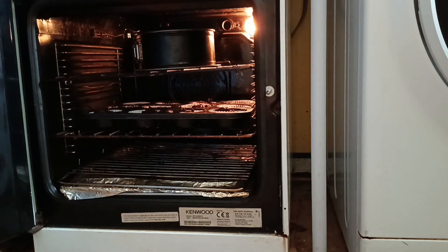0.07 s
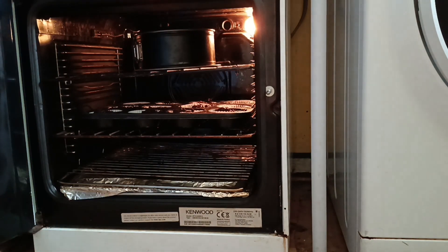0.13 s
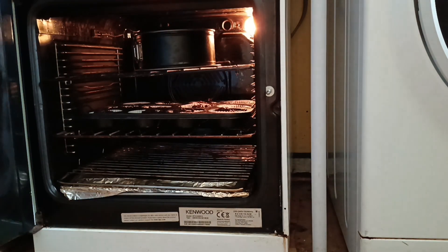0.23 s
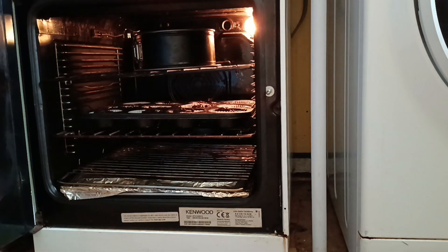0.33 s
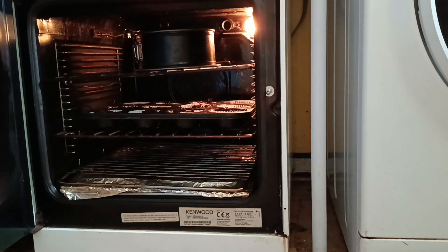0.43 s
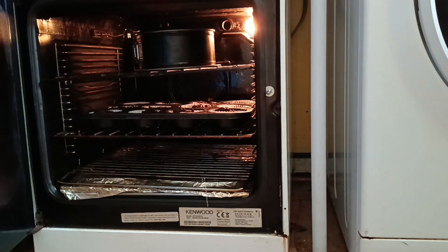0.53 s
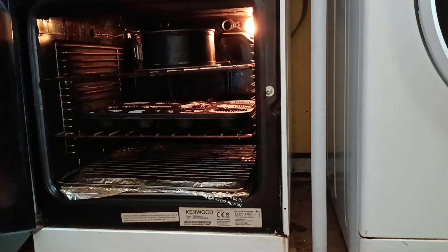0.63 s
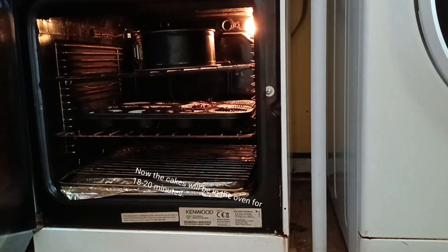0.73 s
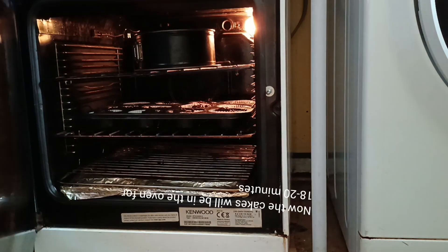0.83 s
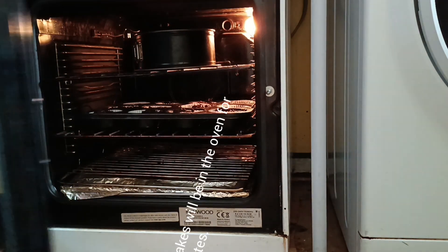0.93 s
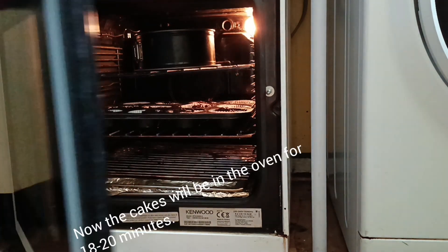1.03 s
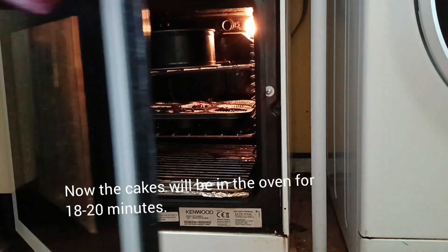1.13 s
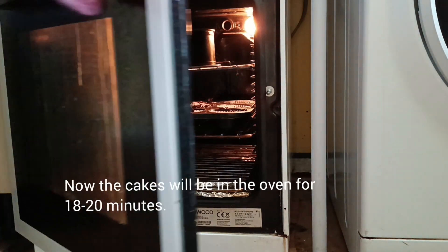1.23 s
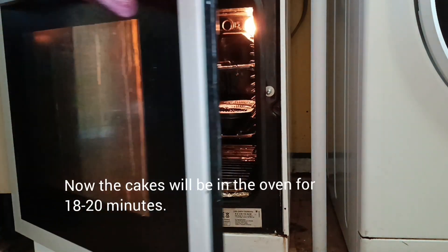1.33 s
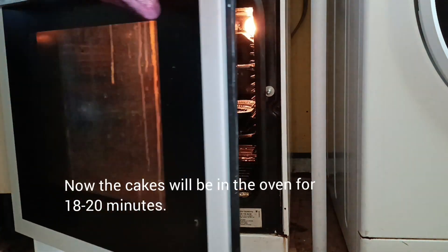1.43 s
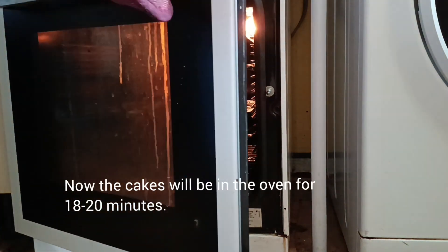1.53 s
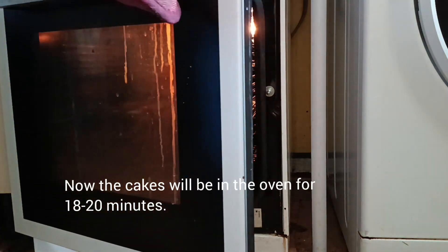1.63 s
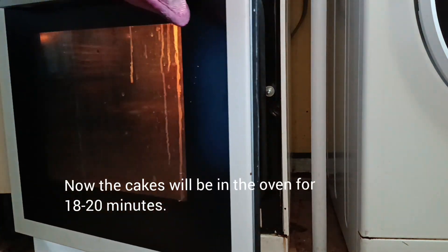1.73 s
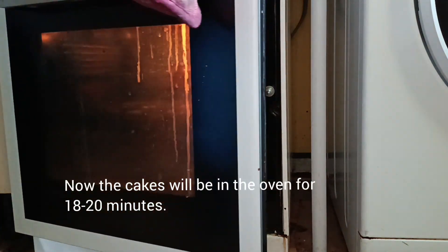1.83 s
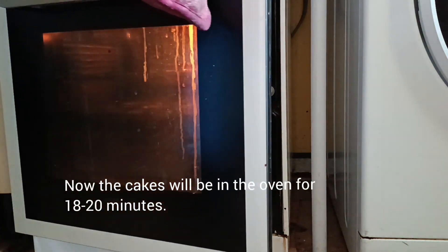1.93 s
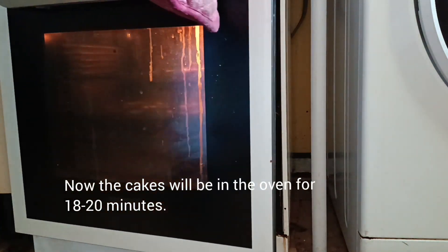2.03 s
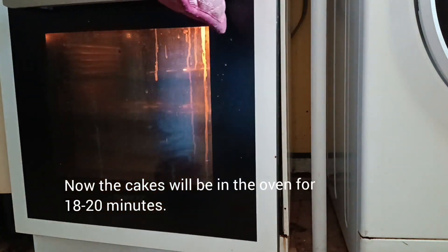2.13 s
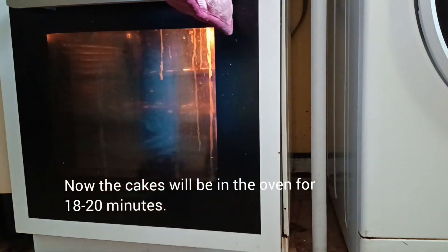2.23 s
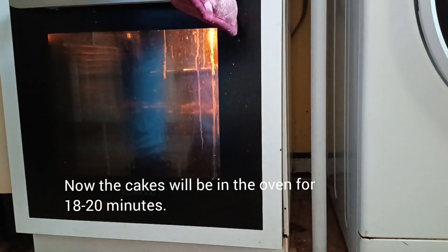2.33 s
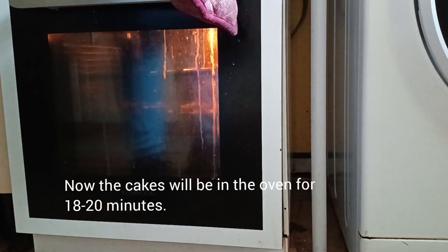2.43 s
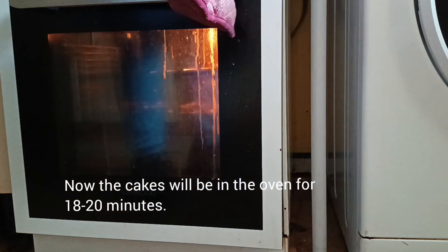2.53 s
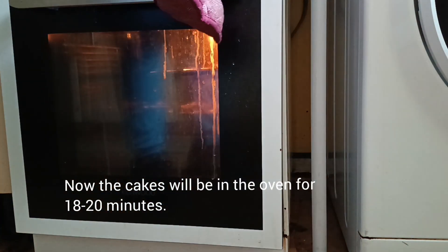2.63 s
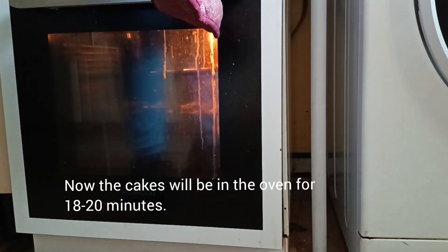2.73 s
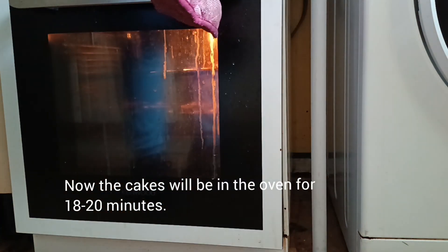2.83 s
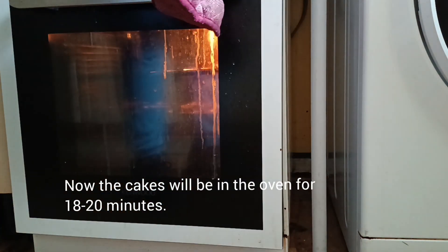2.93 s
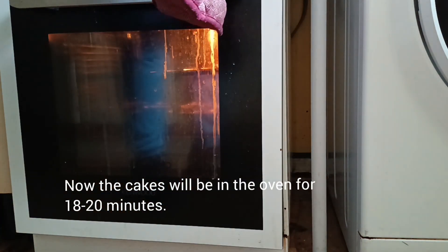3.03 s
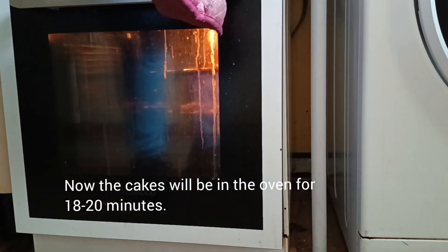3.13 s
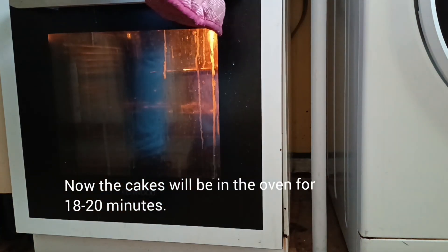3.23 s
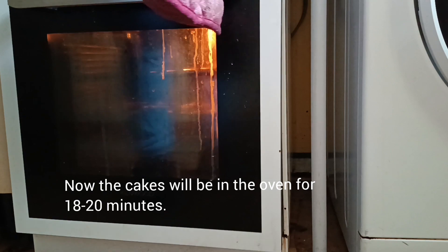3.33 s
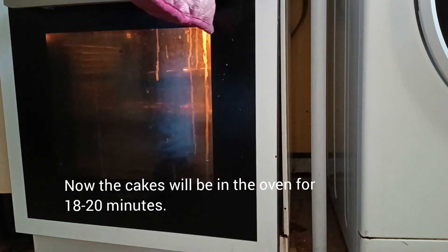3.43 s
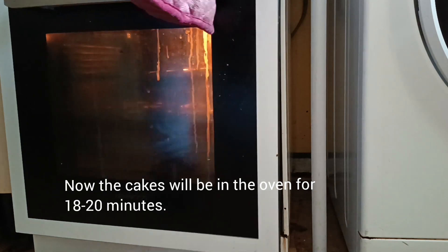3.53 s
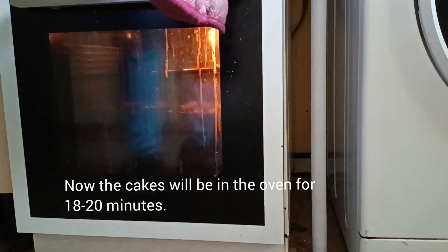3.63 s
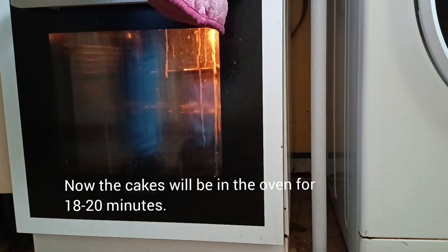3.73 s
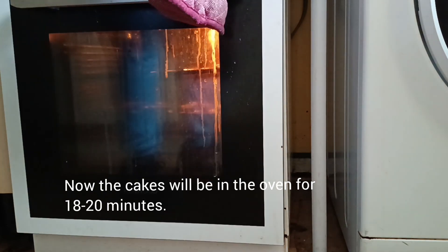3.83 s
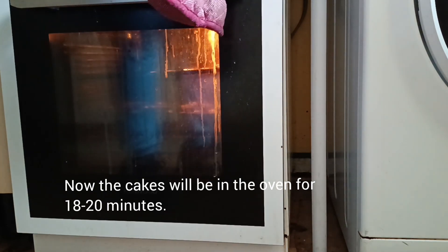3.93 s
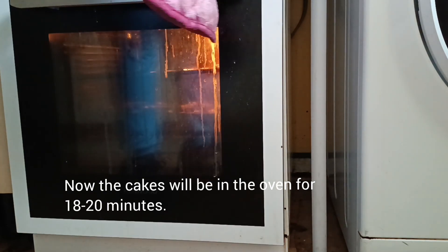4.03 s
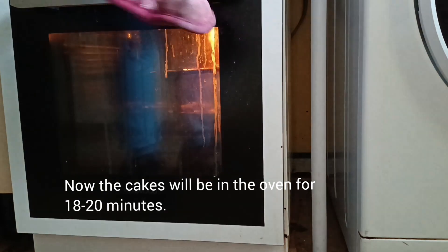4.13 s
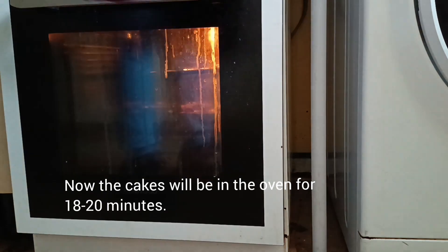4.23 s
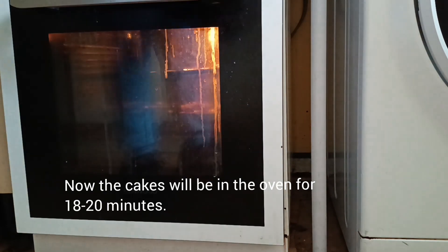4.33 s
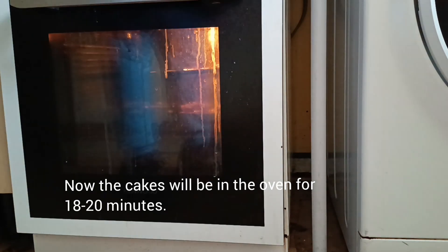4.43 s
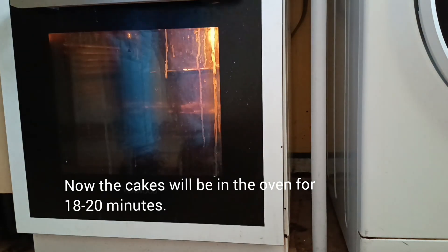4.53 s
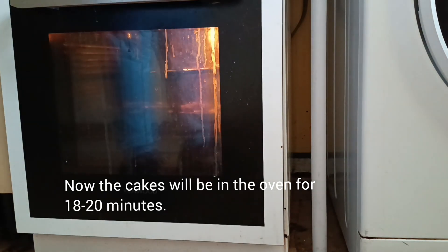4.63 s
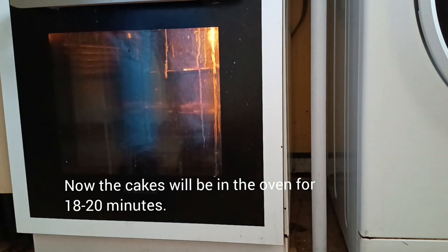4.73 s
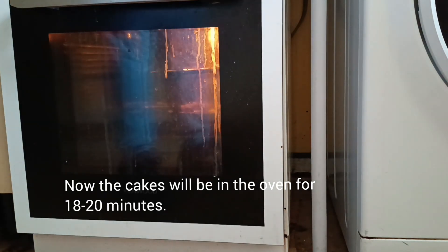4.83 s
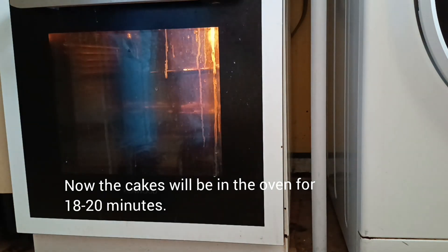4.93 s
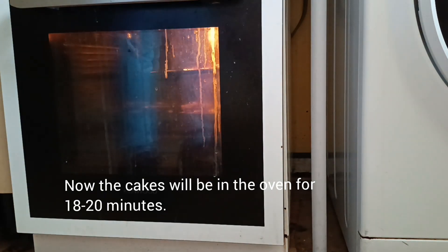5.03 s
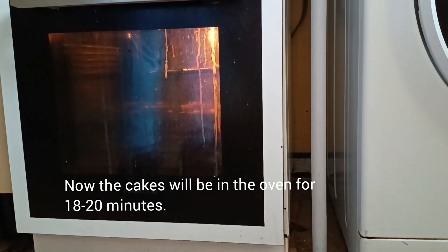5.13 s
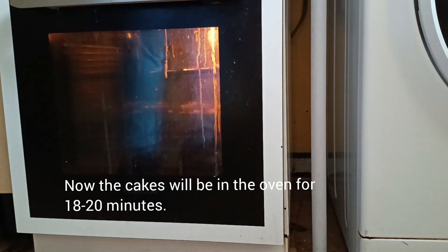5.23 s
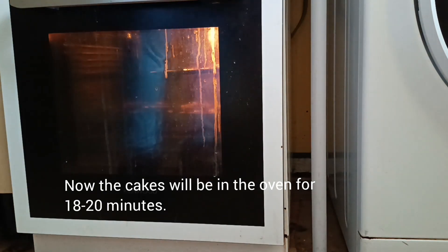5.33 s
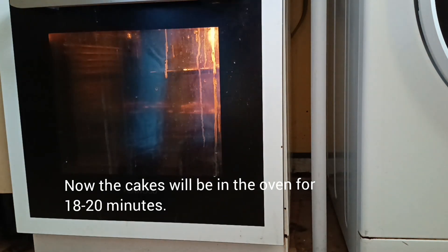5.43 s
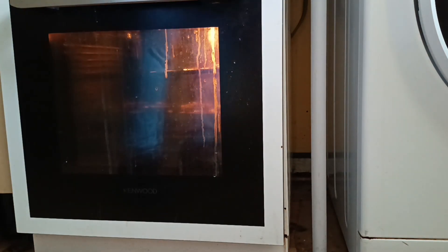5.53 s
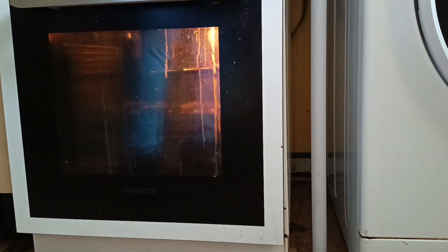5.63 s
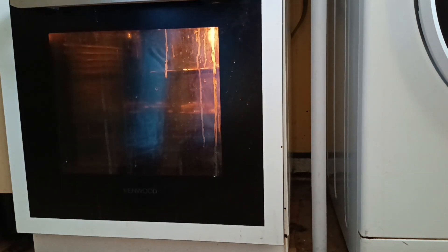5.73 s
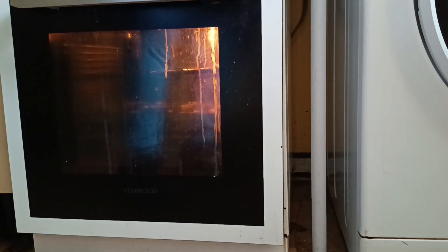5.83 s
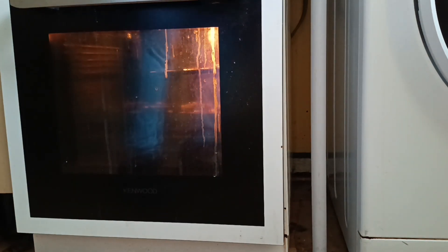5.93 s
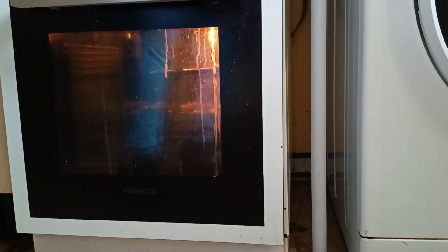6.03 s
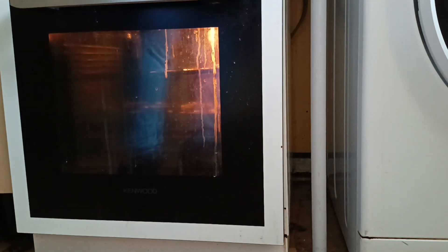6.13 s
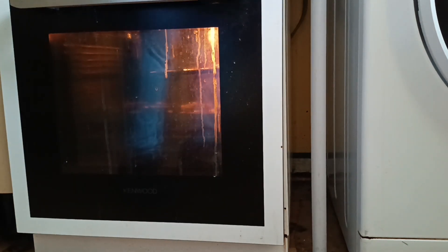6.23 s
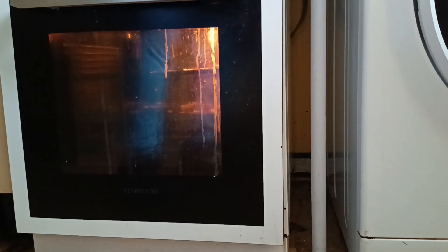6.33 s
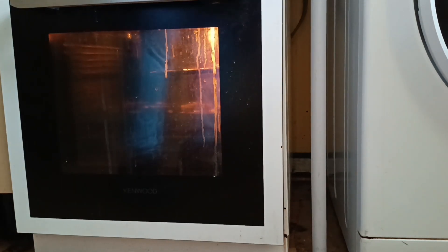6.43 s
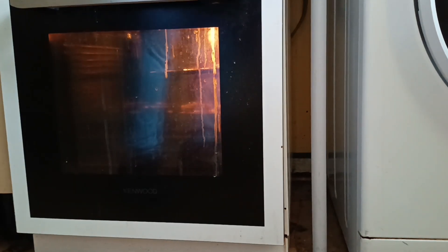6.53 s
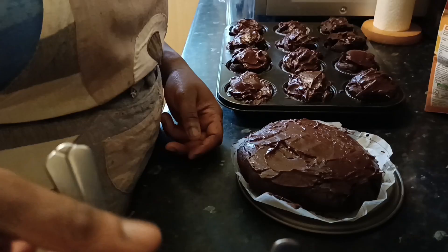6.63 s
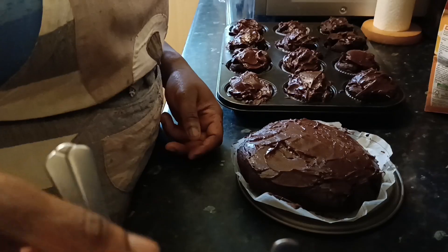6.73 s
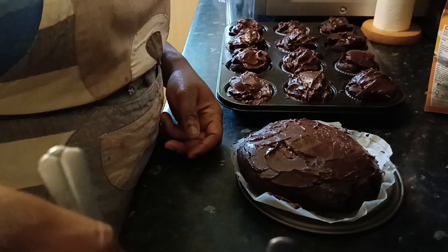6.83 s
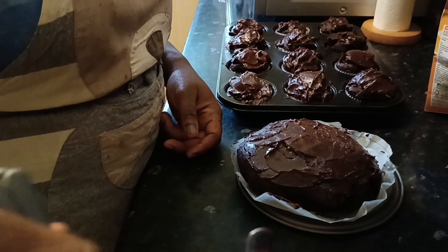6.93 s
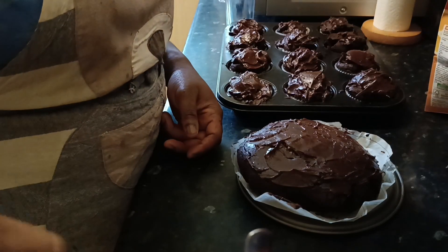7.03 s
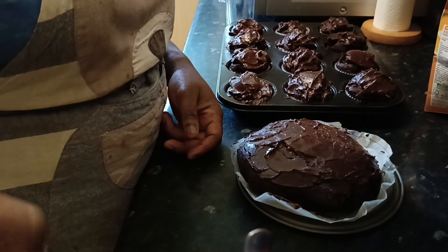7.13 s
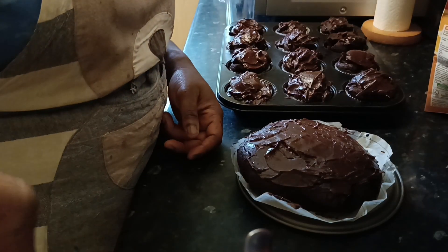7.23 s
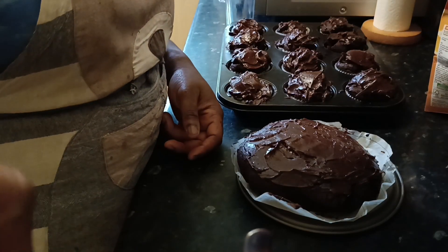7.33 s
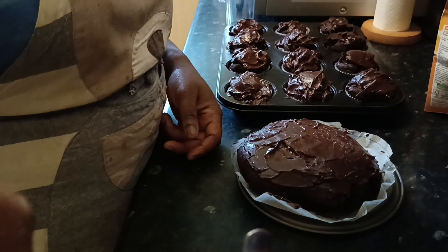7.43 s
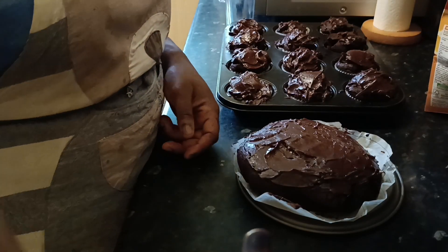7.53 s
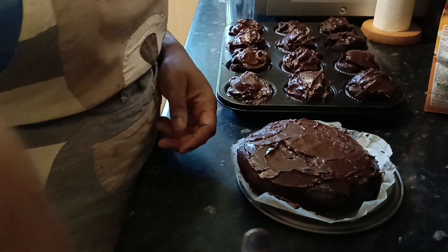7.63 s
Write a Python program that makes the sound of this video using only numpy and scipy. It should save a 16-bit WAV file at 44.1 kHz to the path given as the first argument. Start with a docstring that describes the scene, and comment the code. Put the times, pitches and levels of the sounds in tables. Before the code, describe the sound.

Close in a small home kitchen, an open oven's fan roars softly while cloth rustles. The door is pushed to with a dull double knock, the hinge squeaks faintly, the roar swells through a reopened crack, then a loud bang and rattle shut it. A steady low mains hum remains with small ticks and cloth. After a short silence, things are tapped and slid on a worktop. Small stereo microphone nearby.

```python
"""A fan roars in an oven in a small kitchen, cloth rustling by it; the door is pushed to, reopened a crack and banged.
The roar dies to a mains hum while small things tick; after a short silence, things are set down on a worktop.
Roar, room, cloth and impacts are noise in third octaves, each under its own power envelope. Panels, catch
and small hard parts ring as decaying sines; the open cavity, hinge and scrapes are noise in narrow resonances."""
import sys
import numpy as np
from scipy import signal
from scipy.io import wavfile

SR = 44100
rng = np.random.default_rng(int(sys.argv[2]) if len(sys.argv) > 2 else 0)


def magnitude_from_level(level_db):
    """Linear magnitude for a level in decibels (20 dB per decade)."""
    exponent = np.asarray(level_db, float) / 20
    return 10 ** exponent


def master(y):
    """Save y as 16-bit WAV."""
    cut = np.clip(np.atleast_2d(y).T, -1, 1)
    pcm = np.round(cut * 32767)  # scale
    wavfile.write(sys.argv[1], SR, pcm.astype(np.int16))


N = 338757
STEP = 16   # samples between points of a power envelope
EDGES_HZ = 28 * 2 ** (np.arange(29) / 3)   # third octaves
SILENCE_FROM_S, SILENCE_TO_S = 6.577, 6.704
MOVE_S = (SILENCE_FROM_S + SILENCE_TO_S) / 2   # kitchen before, worktop after

# Fan air through the door gap. Each row: time in seconds, level in dB.
FAN_GAP = [(0, -42), (.9, -42), (1.9, -46.5), (2.3, -49), (2.5, -56.5), (3.25, -54), (3.5, -44), (3.7, -51),
           (4.2, -57.5), (5.0, -63), (6.58, -64)]
# Door on frame and catch, with rebounds. Each row: start in seconds, base level in dB,
# bass boost in dB, treble boost in dB, base ring time in seconds.
DOOR_BLOWS = [(2.373, -18, 8, -1.5, 0.25), (2.4, -25, -1.5, -6, 0.55), (2.441, -42.5, -12, -1.5, 0.95),
              (2.482, -41.5, -18, 0, 0.75), (3.677, -19.5, 8.5, 7, 0.15), (3.699, -10, -12, -5.5, 0.43),
              (3.75, -29.5, 10.5, -3, 0.68), (3.815, -30, 8, -5.5, 0.46), (4.0315, -28, -12, 7, 0.27)]
# Small ticks and taps. Each row: time in seconds, base level in dB, bass setting in dB,
# body frequency in Hz, base rise in seconds.
TAPS = [(2.9794, -52, 10.5, 1670, .002), (3.3024, -50, -6, 1600, .008), (4.0335, -25, -14, 1500, .001),
        (4.4261, -45, -20, 790, .004), (4.6172, -35, -5, 2220, .002), (4.634, -33, -14, 850, .001),
        (4.6806, -38, -12, 2290, .002), (5.274, -42, -10, 2400, .012), (5.3146, -40, -20, 1750, .005),
        (5.36, -32, -16.5, 3500, .006), (5.435, -27, -19, 3320, .008), (5.528, -36, -12, 3240, .004),
        (5.537, -23, -30, 3200, .003), (5.612, -42, -12, 1300, .004), (5.626, -23, -20, 3050, .0015),
        (5.91, -44, -25, 1135, .002), (6.3961, -31, -38.5, 2200, .001), (6.7139, -44.5, 4.5, 1100, .002),
        (6.7847, -44.5, 13.5, 802, .002), (6.8464, -36.5, -0.5, 1860, .002), (6.9217, -29, -38, 2660, .001),
        (6.95, -31, -21, 1020, .002), (7.4, -47, 4, 900, .01), (7.575, -47, 3, 1500, .012)]
# Correlation of the two ports. Each row: frequency in Hz, left-right likeness from -1 to 1.
PORT_LIKENESS = [(100, .996), (150, .86), (350, .87), (600, .52), (1650, .1), (4970, -.06)]
# Colour of cloth and shelf chatter. Each row: frequency in Hz, relative density in dB per Hz.
CLOTH_COLOUR = [(59, -45.5), (100, -12.5), (166, -7), (266, -10.5), (535, -5), (910, -14), (1450, -6.5),
                (2520, -6), (5080, -12.5), (14700, -18), (16000, -22)]


def power_ratio(db):
    """Decibels express power on a logarithmic scale: 10 dB is a tenfold power."""
    return magnitude_from_level(2 * db)


def in_time(rows, outside=None):
    """Linear interpolation gives a curve its value at every sample."""
    s, values = np.transpose(rows)
    return np.interp(np.arange(N) / SR, s, values, outside, outside)


def at_hz(points, hz):
    """Linear interpolation on a logarithmic frequency axis reads a spectrum."""
    points = np.array(points, float)
    return np.interp(np.log(hz), np.log(points[:, 0]), points[:, 1])


def drift(rate_hz, step=1):
    """Low-pass filtered white noise, by two equal poles, is a slow random motion; spread 1."""
    r = np.exp(-128 * np.pi * rate_hz / SR)   # one point per 64 samples
    white = rng.standard_normal(N // 64 + 2002)
    slow = signal.lfilter([1], [1, -2 * r, r * r], white)[2000:]
    return np.interp(np.arange(0, N, step) / 64, np.arange(len(slow)), slow / slow.std())


def band_power(spectrum):
    """Density times bandwidth gives each third octave its share of the whole power."""
    centre = np.sqrt(EDGES_HZ[1:] * EDGES_HZ[:-1])
    power = power_ratio(at_hz(spectrum, centre)) * np.diff(EDGES_HZ)
    return power / power.sum()


def likeness(hz):
    """Correlation between spaced receivers depends on frequency."""
    return np.clip(at_hz(PORT_LIKENESS, hz), -1, 1)


def two_ports(mid, side, hz):
    """Weighted sum and difference of independent noises set the correlation of two channels."""
    alike = likeness(hz)
    return np.sqrt(1 + alike) * mid + np.sqrt(1 - alike) * side * [[1], [-1]]


def bands(source, powers):
    """Band-pass filtering shapes noise into third octaves, each with its own power and likeness."""
    # Level balance of the ports. Each row: frequency in Hz, left minus right in dB.
    port_balance = [(60, 0), (1650, 0), (4970, -3), (9000, 2), (15000, 7.5)]
    out = np.zeros((2, N))
    for k, power in enumerate(powers):
        low, high = EDGES_HZ[k], EDGES_HZ[k + 1]
        band = signal.butter(2, [low, high], "band", fs=SR, output="sos")
        mid, side = signal.sosfilt(band, source[k % 2])   # neighbours use unrelated noise
        hz = np.sqrt(low * high)
        pan_db = at_hz(port_balance, hz) / 2
        gain = np.sqrt(power * SR / 4 / (high - low))
        gain = np.interp(np.arange(N), np.arange(0, N, STEP), gain)
        out += two_ports(mid, side, hz) * magnitude_from_level([[pan_db], [-pan_db]]) * gain
    return out


def add_impact(power, s, level_db, rise, ring, crack=2.26, crack_s=.0067):
    """An impact's power rises briefly, with a fast-dying crack over an exponential decay."""
    start = round(s * SR / STEP)
    t = np.arange(min(round(ring * SR / STEP), len(power) - start)) * STEP / SR
    fall = power_ratio(-60 * t / ring)
    shape = (fall + crack * np.exp(-t / crack_s)) * (1 - np.exp(-(t / rise) ** 2))
    power[start:start + len(t)] += power_ratio(level_db) * shape


def landing(bass_db):
    """Contact time grows with the weight of a blow: bassier blows land more slowly, in seconds."""
    return .003 * np.exp(.08 * bass_db)


def rasp(white, start, end, level_db, from_hz, to_hz, width_hz):
    """Low-passed noise on a gliding carrier makes a moving resonance that swells and sinks."""
    first, count = round(start * SR), round((end - start) * SR)
    r = np.exp(-np.pi * width_hz / SR)
    lead_in = white[:, first - SR // 20:first + count]
    slips = signal.lfilter([np.sqrt(1 - r * r)], [1, -r], lead_in)[:, -count:]
    phase = 2 * np.pi * np.cumsum(np.linspace(from_hz, to_hz, count)) / SR
    mid, side = slips[:2] * np.cos(phase) + slips[2:] * np.sin(phase)
    pair = two_ports(mid, side, from_hz) / np.sqrt(2)
    swell = np.sqrt(np.sin(np.linspace(0, np.pi, count)).clip(0))
    out = np.zeros((2, N))
    out[:, first:first + count] = magnitude_from_level(level_db) * swell * pair
    return out


def fan_and_room():
    """Transmission through the door gap sets the broadband fan roar, over steady room noise."""
    # Colours of roar, kitchen with shut oven, and worktop. Each row: frequency in Hz,
    # relative density in dB per Hz.
    fan_air = [(29, -68), (50, -39), (65, -29), (80, -14), (100, -1), (139, -3.5), (200, -9), (300, -15.5),
               (400, -21.5), (520, -12.5), (680, -18.5), (900, -19.5), (1100, -14.5), (1450, -16.5),
               (2300, -18.5), (2800, -30.5), (8000, -66.5), (17600, -110)]
    kitchen_air = [(30, -26.5), (64, -4.5), (85, 11), (125, -7), (200, -7), (311, -6.5), (486, -11.5),
                   (740, -22), (1000, -28), (2200, -24.5), (4000, -33.5), (8000, -44.5), (16000, -44)]
    worktop_air = [(18, -64), (40, -14), (140, 8), (240, -33), (355, -4), (702, -7.5), (1250, -16),
                   (2540, -10), (16000, -41.5)]
    oven_side = np.arange(0, N, STEP) < SR * MOVE_S
    gap_db, open_db = in_time(FAN_GAP)[::STEP], FAN_GAP[0][1]
    kitchen = band_power(kitchen_air) * power_ratio(-53.5)
    worktop = band_power(worktop_air) * power_ratio(-55)
    powers = []
    for k, fan in enumerate(band_power(fan_air)):
        share = at_hz([(130, 0.74), (400, 1)], EDGES_HZ[k])   # bass also leaks through the shut door
        roar = fan * power_ratio(open_db + share * (gap_db - open_db)) * oven_side
        room = np.where(oven_side, kitchen[k], worktop[k])
        powers.append((roar + room) * power_ratio(1.3 * drift(5, STEP)))
    return np.array(powers)


def whistle(white, hz, width_hz):
    """A two-pole resonance narrows noise to a breathy tone; rms 1."""
    r = np.exp(-np.pi * width_hz / SR)
    mid, side = signal.lfilter([1, 0, -1], [1, -2 * r * np.cos(2 * np.pi * hz / SR), r * r], white)
    pair = two_ports(mid, side, hz)
    return pair / pair.std()


def cavity():
    """Cavity resonance colours the roar as the gap lets it out; each mode swells and sinks."""
    # Each row: frequency in Hz, width in Hz, mean level in dB relative to the gap level.
    resonances = [(140, 8.4, -12), (207.5, 5.3, -10.5), (263, 11, -16), (478, 16, -13), (560, 60, -10),
                  (744, 24, -14.5), (838, 25, -17), (1040, 40, -12.5), (1100, 40, -10), (1240, 32, -13),
                  (1773, 110, -15), (2340, 70, -19.5)]
    white = rng.standard_normal((2, N))
    out = np.zeros((2, N))
    for k, (hz, width_hz, db) in enumerate(resonances):
        unrelated = np.roll(white, 9973 * k, axis=1)
        out += magnitude_from_level(db + 2.5 * drift(3)) * whistle(unrelated, hz, width_hz)
    return magnitude_from_level(in_time(FAN_GAP, -150)) * out


def hum():
    """Magnetic force drives the fan motor at twice the mains rate; level and pitch waver a little."""
    open_db, shut_db, shut_s = -49.5, -42.5, 3.7   # stronger once the door is banged shut
    phase = 2 * np.pi * np.cumsum(100.5 + 1.0 * drift(4.7)) / SR   # Hz, wandering by 1 Hz
    t, waver_db = np.arange(N) / SR, 1.3 * drift(6)
    level_db = np.where(t < shut_s, open_db + 2.5 * waver_db, shut_db + waver_db)
    return np.sqrt(2) * magnitude_from_level(level_db) * np.sin(phase) * (t < MOVE_S)


def grains(spread_db):
    """Many tiny slips of unequal size make impulsive noise; rms 1."""
    size_db = spread_db * np.minimum(rng.exponential(1, N), 5)
    out = rng.standard_normal((2, 2, N)) * magnitude_from_level(size_db)
    return out / out.std()


def cloth_weave():
    """Friction noise has a broad spectrum, scaled here to unit power above about 5 kHz."""
    weave = band_power(CLOTH_COLOUR)
    return weave / weave[EDGES_HZ[:-1] > 4400].sum()


def cloth():
    """Stick-slip friction of fibres makes clumped noise that swells and fades with each brush."""
    # Each row: peak time in seconds, level above 5 kHz in dB before tilt, seconds to rise 20 dB,
    # seconds to fall 20 dB, tilt in dB per octave.
    brushes = [(.35, -73, .6, .5, 2.2), (.495, -54.5, .012, .14, .3), (.585, -54, .2, .1, -1),
               (.678, -60, .008, .018, 5), (1.07, -60, .025, .04, .8), (1.25, -69, .3, .1, 8),
               (1.398, -59, .012, .06, -.8), (1.47, -64, .02, .04, 1.8), (1.6, -53, .09, .06, -1.5),
               (1.792, -59, .023, .04, .8), (1.894, -67, .08, .17, 4), (2.734, -58.5, .1, .07, -3),
               (3.134, -69, .3, .25, -1.2), (3.308, -69, .02, .4, -3), (3.39, -64.5, .03, .08, .8),
               (4.17, -67, .3, .3, 3), (4.28, -64, .05, .3, .1), (4.428, -60, .02, .05, 4),
               (4.62, -54, .013, .06, .8), (4.635, -52, .005, .2, .8), (4.74, -54, .25, .09, -2.2),
               (5.15, -64, .6, .8, 1.8), (5.285, -56, .06, .05, -.4), (5.32, -57, .02, .05, .4),
               (5.365, -56, .02, .04, .4), (6.788, -53, .012, .07, .3), (6.85, -54, .02, .2, .4),
               (6.925, -45, .03, .13, 1.6), (7.08, -56, .3, .05, -.5), (7.172, -50, .012, .06, 3),
               (7.235, -53, .015, .06, 1), (7.33, -46, .2, .2, 1.6), (7.4, -42, .03, .3, 1),
               (7.62, -43.5, .2, .6, 1.8)]
    peak, brush_db, rise, fall, tilt = np.transpose(brushes)[:, :, None]
    late = np.arange(0, N, STEP) / SR - peak
    # a brush holds a while before it fades
    drop = np.where(late > 0, (np.abs(late) / fall) ** 1.6, -late / rise)
    strokes = power_ratio(brush_db - 20 * drop)
    clumps = power_ratio(2.2 * drift(32, STEP))   # fibres catch and slip in clumps
    powers = []
    for hz, weave in zip(EDGES_HZ, cloth_weave()):
        tilted = power_ratio(tilt[:, 0] * np.log2(max(hz, 1500) / 8000)) @ strokes
        powers.append(weave * tilted * clumps * power_ratio(1.5 * drift(14, STEP)))
    return np.array(powers)


def door_blows():
    """High modal density makes the struck door ring as noise, lows building up later."""
    # Colour of the ringing. Each row: frequency in Hz, relative density in dB per Hz.
    door_colour = [(24, -41.5), (40, -17), (99, 3.5), (189, -13.5), (209, -14.5), (262, -11), (467, -10.5),
                   (529, -13.5), (896, -17), (2050, -11), (3380, -23), (11000, -29), (16000, -36)]
    # Each row: frequency in Hz, multiplier of the base ring time.
    ring_share = [(60, 1.6), (200, 1.7), (1000, 1.03), (4000, 1.29), (9000, 0.82), (15000, 1.1)]
    rattle = power_ratio(2.2 * drift(90, STEP))   # loose parts rattle: the level above 600 Hz flickers
    powers = []
    for hz, door in zip(EDGES_HZ, band_power(door_colour)):
        bass_share = at_hz([(300, 0.84), (1200, 0.11)], hz)
        treble_share = at_hz([(3000, 0.26), (15000, 0.8)], hz)
        blows = np.zeros(len(rattle))
        for s, base_db, bass_db, treble_db, ring in DOOR_BLOWS:
            level_db = base_db + bass_db * bass_share + treble_db * treble_share
            rise = landing(bass_db) + 1.7 / hz
            add_impact(blows, s, level_db, rise, ring * at_hz(ring_share, hz))
        powers.append(door * blows * (rattle if hz > 600 else 1))
    return np.array(powers)


def panels():
    """Modal excitation: each blow rings the panel modes in a fresh phase; a hand damps them early on."""
    # Each row: frequency in Hz, relative level in dB when pushed to, relative level in dB
    # when banged, undamped 60 dB decay time in seconds.
    panel_modes = [(84, -2.5, -14, .3), (103, -5, -9, .45), (127.5, -6, -9, 0.46), (186, -11.5, -6.5, .4),
                   (210.5, -35, -21, 1.5), (276, -20.5, 2.5, .22), (318, -5, 2.5, .15),
                   (368, 16, 4.5, 0.13), (423, -1, -10, 0.3), (523, -0.5, -5.5, .3), (736, -1.5, -5, .3),
                   (1246, -10, -12, .2), (1600, 0, -7, 0.14), (1780, -9, -15, 0.28), (2080, -8, -10, 0.5),
                   (2310, -14, -18, 0.39), (2485, -12, -16, .3), (2660, -16, -9, 0.21)]
    out, t = np.zeros((2, N)), np.arange(SR * 2 // 3) / SR
    hz, pushed_db, banged_db, t60 = np.transpose(panel_modes)[:, :, None]
    apart = np.arccos(likeness(hz))   # phase between the ports
    turns = rng.uniform(0, 2 * np.pi, (len(DOOR_BLOWS), len(hz), 1))
    for (s, base_db, bass_db, treble_db, _), turn in zip(DOOR_BLOWS, turns):
        level_db, damp = (banged_db, 1) if s > 3 else (pushed_db, 1.5)
        # broad blows drive the modes harder
        level_db = level_db + base_db - 6 + .6 * bass_db + .8 * treble_db
        onset = 1 - np.exp(-(t / (landing(bass_db) + 1 / hz)) ** 2)
        fall = magnitude_from_level(level_db - 60 * damp * t / t60) * onset
        first = round(s * SR)
        for side in (0, 1):
            ring = fall * np.sin(2 * np.pi * hz * t + turn + side * apart)
            out[side, first:first + len(t)] += ring.sum(axis=0)
    return out


def creaks():
    """Stick-slip in the dry hinge squeaks in thin gliding resonances."""
    # Each row: start in seconds, end in seconds, level in dB, Hz at start, Hz at end.
    squeaks = [(2.65, 2.84, -62, 3580, 3680), (2.72, 2.8, -60, 2650, 2800), (2.72, 2.79, -63, 4400, 4150),
               (2.73, 2.85, -58, 1920, 1880), (2.88, 3.23, -65, 2820, 2680), (2.915, 2.99, -65, 3620, 3720),
               (2.95, 3.03, -64, 2350, 2550), (3.05, 3.15, -67, 3700, 3760), (3.13, 3.22, -62, 2760, 2560)]
    white = rng.standard_normal((4, N))
    return sum(rasp(np.roll(white, row[3], axis=1), *row, width_hz=55) for row in squeaks)


def ticks():
    """A small impact is a sharp crack over short noise, coloured by the resonance of its body."""
    # Colour of ticks. Each row: frequency in Hz, relative density in dB per Hz.
    tick_colour = [(88, -7.5), (150, -7.5), (457, -17), (774, -12), (1310, -14.5), (1900, -8.5),
                   (3350, -8.5), (4950, -23.5), (5900, -11), (9000, -29.5), (12000, -23), (16000, -39)]
    powers = []
    for hz, tick in zip(EDGES_HZ, band_power(tick_colour)):
        power = np.zeros(len(range(0, N, STEP)))
        shorter = at_hz([(3500, .98), (9000, .6)], hz)   # treble rings shorter
        bass_share = at_hz([(400, 0.99), (1500, 0.032)], hz)
        for s, base_db, bass_db, body_hz, rise in TAPS:
            level_db = base_db - 15.5 + (bass_db + 23) * bass_share
            level_db += 6 * np.exp(-(np.log2(hz / body_hz) / 0.58) ** 2)
            ring = shorter * max(.27 + .004 * bass_db, .02)   # heavier taps ring longer
            add_impact(power, s - .002, level_db, rise + 1 / hz, ring, crack=14, crack_s=.004)
        powers.append(tick * power)
    return np.array(powers)


def clinks():
    """Modal ringing: every tick sets a small hard part sounding in six close, fast-decaying modes."""
    out, t = np.zeros((2, N)), np.arange(SR // 10) / SR
    for (s, base_db, _, hz, rise), chance in zip(TAPS, rng.random((len(TAPS), 3, 6, 1))):
        modes = hz * 2 ** (.6 * chance[0] - .25)
        fall = magnitude_from_level(-60 * t * modes / 28) * (1 - np.exp(-(t / rise) ** 2))   # 60 dB in 28 cycles
        first = round(s * SR)
        for side in (0, 1):
            ring = (fall * np.sin(2 * np.pi * (modes * t + chance[1 + side]))).sum(axis=0)
            out[side, first:first + len(t)] += magnitude_from_level(base_db - 10) * ring
    return out


def chatter():
    """Repeated contact of the shelves after the bang makes a short burst of noise."""
    # Each row: time in seconds, level above 5 kHz in dB.
    shelf_curve = [(3.72, -51), (3.78, -43.5), (3.9, -40), (3.94, -56), (4.0, -80)]
    return cloth_weave()[:, None] * power_ratio(in_time(shelf_curve, -150)[::STEP])


def catch():
    """Modal ringing: the catch drops home and its own modes decay freely."""
    # Each row: frequency in Hz, relative level in dB, 60 dB decay time in seconds.
    catch_modes = [(600, -6, .25), (900, -6, .22), (1233, -5, .25), (1500, 2, .09), (1570, 2, .12),
                   (2083, -6, .15), (2750, -2, .18), (3700, -8, .1), (14600, -8, .1)]
    out, t = np.zeros((2, N)), np.arange(SR // 4) / SR
    hz, db, t60 = np.transpose(catch_modes)[:, :, None]
    fall = magnitude_from_level(-27 + db - 60 * t / t60) * (1 - np.exp(-t / .001))
    first = round(4.0315 * SR)
    for side, turn in enumerate(rng.random((2, len(hz), 1))):
        ring = fall * np.sin(2 * np.pi * (hz * t + turn))
        out[side, first:first + len(t)] = ring.sum(axis=0)
    return out


def scrapes():
    """Rough sliding friction excites one broad gliding resonance, flickering in level."""
    # Each row: start in seconds, end in seconds, mean level in dB, Hz at start, Hz at end, width in Hz.
    strokes = [(4.63, 4.71, -48, 900, 780, 150), (4.63, 4.66, -53, 3200, 3400, 300),
               (4.675, 4.75, -51, 2250, 2250, 100), (4.75, 4.8, -60, 3250, 3100, 150),
               (6.705, 6.78, -52, 450, 400, 200), (6.99, 7.11, -51, 2450, 2700, 300),
               (7.26, 7.38, -51, 1800, 2500, 600), (7.385, 7.55, -46, 1600, 1300, 800),
               (7.39, 7.67, -54, 450, 550, 250)]
    white = rng.standard_normal((4, N))
    return magnitude_from_level(3 * drift(60)) * sum(rasp(white, *row) for row in strokes)


def scene():
    """Superposition of all sources at the two microphone ports."""
    airborne = bands(rng.standard_normal((2, 2, N)), fan_and_room() + door_blows())
    contacts = bands(grains(4.6), cloth() + ticks() + chatter())
    ringing = panels() + clinks() + catch()
    return airborne + contacts + cavity() + hum() + creaks() + scrapes() + ringing


def roll_off(x):
    """The treble ends steeply here."""
    return signal.sosfilt(signal.butter(12, 16000, fs=SR, output="sos"), x)


def record(dry):
    """High-pass response of a small microphone and soft saturation; silence parts the two places."""
    t = np.arange(N) / SR
    kitchen_heard = np.clip((SILENCE_FROM_S - t) / 0.00035, 0, 1)
    worktop_heard = np.clip((t - SILENCE_TO_S) / .008, 0, 1)
    dry = signal.sosfilt(signal.butter(2, 55, "high", fs=SR, output="sos"), dry)
    rounded = .9 * np.tanh(dry / .9)   # peaks are rounded
    return roll_off(rounded * (kitchen_heard + worktop_heard))


dry = scene()
out = record(dry)
master(out)
```